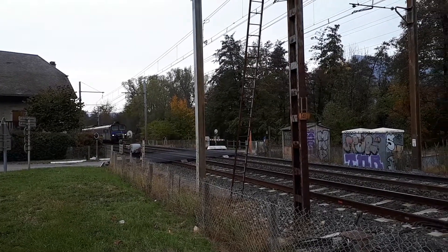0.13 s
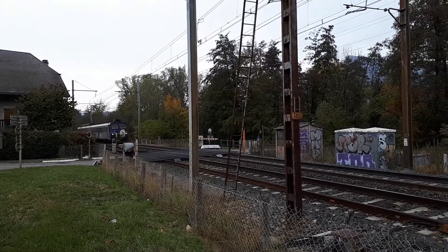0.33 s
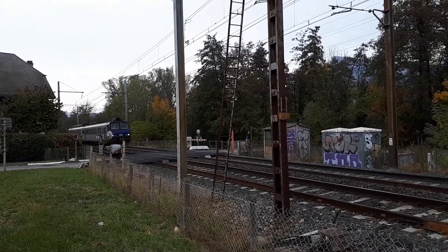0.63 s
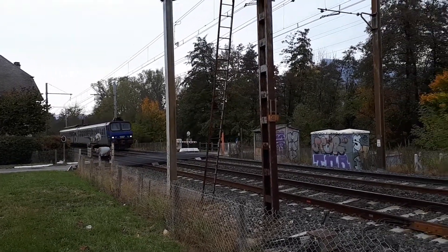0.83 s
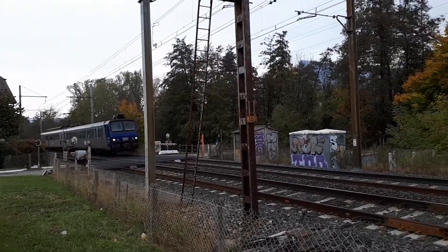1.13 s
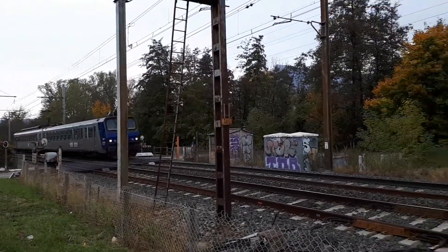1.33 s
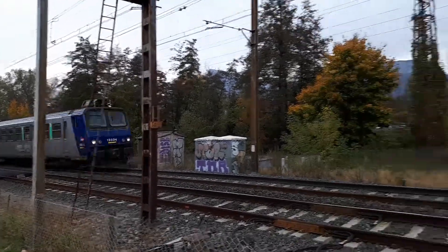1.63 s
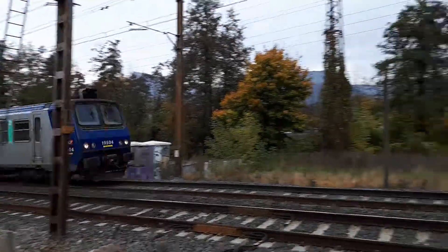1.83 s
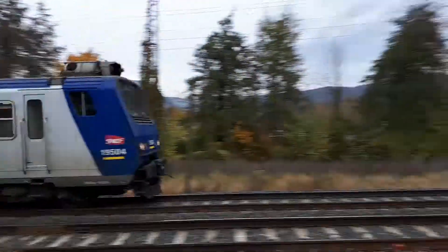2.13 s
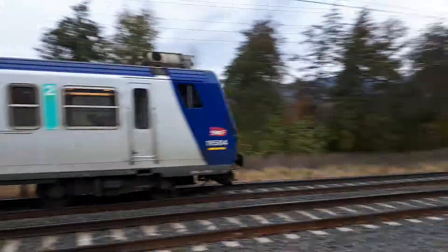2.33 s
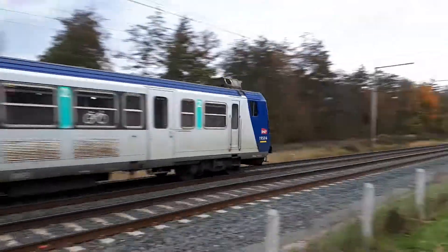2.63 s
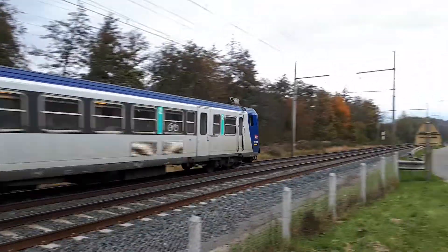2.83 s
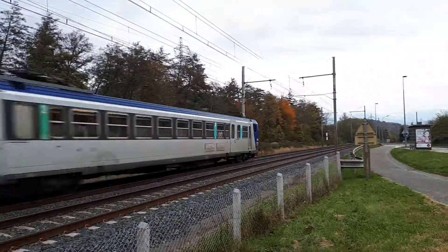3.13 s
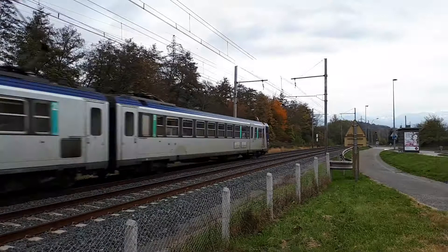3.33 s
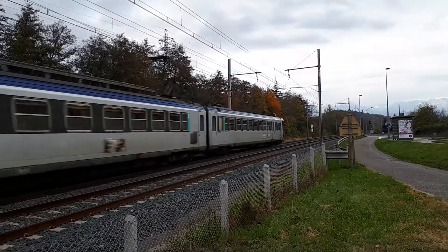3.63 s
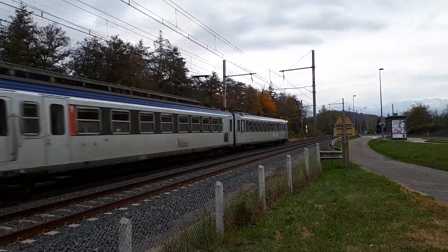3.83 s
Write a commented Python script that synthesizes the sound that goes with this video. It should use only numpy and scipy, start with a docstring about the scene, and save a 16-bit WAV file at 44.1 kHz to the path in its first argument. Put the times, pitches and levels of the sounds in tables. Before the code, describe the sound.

An electric train approaches outdoors, its rolling roar and faint unsteady whine growing from 0 to 1.7 s. One loud, raspy air horn blast lasts from 1.7 to about 2.3 s, its pitch sagging slightly, with faint short echoes. Wheel roar and rumble peak around 2.35 s; bright airy hiss swells near 2.75 s. Rushing cars and falling motor whine continue to 4 s. Close hand-held stereo, level ducking under the horn.

```python
"""An electric train rolls past a lineside position, heard on a hand-held stereo recorder.
Wheels and rails roar as noise ahead, abreast and behind; motors whine in unsteady, sinking lines.
Roof equipment hisses by, and an air horn of rasped partials sounds once just before it is abreast,
with two echoes, over a faint steady hum and hiss. The recorder turns, and its gain control drops
quickly for loud sound and recovers slowly."""
import sys
import numpy as np
from scipy import signal
from scipy.fft import rfft, irfft
from scipy.io import wavfile
from scipy.ndimage import uniform_filter1d, map_coordinates

SR = 44100
rng = np.random.default_rng(int(sys.argv[2]) if len(sys.argv) > 2 else 0)


def linear_from_db(decibels):
    """Turn decibels (scalar or array-like) into linear amplitude factors; 0 gives 1."""
    return 10 ** (np.asarray(decibels, float) / 20)


def waveform_to_disk(signal):
    """Save audio, clipped to [-1, 1], as 16-bit WAV at the path in sys.argv[1]."""
    frames = np.transpose(np.atleast_2d(signal))
    scaled = np.clip(frames, -1, 1) * 32767
    samples = np.round(scaled).astype(np.int16)
    wavfile.write(sys.argv[1], SR, samples)


N = 176400
TIME = np.arange(N) / SR
EARS = np.array([[.5], [-.5]])  # left, right: a difference is shared equally

# The pass, before gain control: (time [s], front roar [dB], side roar [dB], rear roar [dB],
# rumble [dB], left channel lag [samples])
PASS = [(0, -28.5, -50, -60, -35, -5), (.3, -25, -43, -60, -36.5, -4.5), (.7, -24, -35, -57, -32, -4.5),
        (1.1, -20.5, -33, -60, -29.5, -5), (1.35, -16, -47, -57, -27.5, -4),
        (1.65, -14, -22, -46, -25, -5.5), (1.9, -13, -14.5, -44, -23.5, -8),
        (2.2, -18.5, -12, -26, -27.5, -7), (2.35, -14, -6.5, -25.5, -19.5, -9),
        (2.55, -20, -7.5, -17.5, -26, -15.5), (2.75, -37, -13.5, -16, -25.5, -15),
        (3.0, -32, -10, -16, -27, -18.5), (3.15, -33, -15.5, -15.5, -29.5, -18),
        (3.35, -47, -18.5, -13, -25.5, -17), (3.55, -48, -17, -10, -27, -20),
        (3.75, -48, -18.5, -12.5, -27, -18), (3.88, -41, -41, -13, -26, -16.5),
        (4, -47, -28, -13.5, -32.5, -14)]
# Colours of the roar ahead, abreast, behind and of the rumble: (frequency [Hz], relative level [dB per Hz])
FRONT_COLOUR = [(250, -20), (318, -20.5), (466, -2.5), (544, -8.5), (669, -6.5), (809, -6.5), (1070, -0.5),
                (1640, -19.5), (1850, -11), (2160, -18), (2710, -19), (3100, -23), (3930, -23), (4870, -30),
                (7080, -34), (7960, -32), (9210, -51), (11500, -43), (15700, -52)]
SIDE_COLOUR = [(150, -46), (250, -9), (385, -14), (482, -14.5), (603, -3.5), (658, -7), (705, -1.5),
               (1590, -7.5), (1850, -5.5), (2710, -15), (4390, -15.5), (5310, -27.5), (15500, -43)]
REAR_COLOUR = [(150, -49), (250, -16), (335, -13), (583, -6.5), (729, -14.5), (809, 0.5), (1180, -15),
               (1850, -12.5), (2570, -21.5), (4390, -27), (5410, -33), (7380, -33), (8920, -44.5),
               (11400, -42.5), (15500, -49)]
RUMBLE_COLOUR = [(15, -58), (25, -32), (66, -6), (150, 0), (205, 1), (281, -5), (313, -12.5), (330, -7),
                 (430, -38), (730, -120)]
# Motor and gear whine: (time [s], pitch [Hz], level [dB], low gear line [dB re level], octave [dB re level])
WHINE = [(0, 1070, -37, -17, -7), (.8, 1060, -32, -0.5, -21), (1.5, 1042, -27.5, -5, -14),
         (2.3, 990, -20, -21, 10.5), (2.75, 948.2, -20.5, -7, 5), (3.05, 887, -22, -27, 8),
         (3.3, 838.5, -21, -18, -14), (3.55, 813.5, -18.5, -28.5, -3.5), (4, 812, -21, -29, -12)]
# Whine lines: (ratio to pitch [1], drift corner [Hz], unlikeness at the ears [1])
WHINE_LINES = [(1.0, 11, .5), (.449, 7, .3), (2.0, 70, .5), (1.08, 25, .7)]
# Roof equipment going by: (time [s], level [dB])
HISS = [(2.2, -21), (2.45, -14.5), (2.6, -9.5), (2.75, -8), (2.9, -11.5), (3.05, -17), (3.3, -25),
        (3.6, -30.5), (4, -58)]
# Its colour: (frequency [Hz], relative level [dB per Hz])
HISS_COLOUR = [(880, -12), (1500, -10.5), (1860, -3.5), (2700, -16), (3630, -19), (4330, -12.5),
               (5380, -16), (7740, -10), (8970, -21), (12200, -14), (15700, -19)]
# Horn at the two ears; ground and lineside echoes make its partials swell and fade as it sweeps by:
# (time [s], then left, right relative level [dB] of 1st, 2nd, 3rd and upper partials)
HORN = [(1.7, -16, -14, -27, -24, -43, -42, -31, -39), (1.715, -11, -22, -10, -11.5, -21, -25, -22, -24),
        (1.75, -9, -19, -8.5, -9, -13.5, -21, -19, -23), (1.79, -13.5, -19, -16, -27, -23, -27, -20, -21),
        (1.825, -17.5, -18.5, -12, -11.5, -13.5, -21, -16, -16.5),
        (1.86, -19, -8.5, -19, -27, -46, -26, -22, -23),
        (1.9, -15, -8, -10.5, -12.5, -16.5, -22, -23.5, -23),
        (1.94, -13.5, -10.5, -16, -15, -18, -19, -17.5, -18),
        (1.99, -15.5, -9.5, -12.5, -14.5, -18, -36, -18.5, -16.5),
        (2.04, -17, -8.5, -18, -19, -25, -34, -19, -16.5), (2.085, -26, -13, -15, -10, -17, -22, -19, -18),
        (2.125, -18, -35, -21, -27, -16, -15, -13.5, -19),
        (2.165, -35, -19, -14.5, -15, -12.5, -21, -17, -21),
        (2.21, -29, -40, -15, -17, -13, -27, -22.5, -24.5),
        (2.25, -37, -20, -23.5, -15, -14, -37, -26, -22.5),
        (2.285, -15, -18, -21, -18.5, -28, -14, -27, -30)]
# Horn spectrum: (multiple of pitch [1], relative level [dB])
HORN_PARTIALS = [(1, -4.5), (2, 3.5), (3, 6), (4, -12), (5, -14), (6, -15.5), (7, -14.5), (8, -18.5),
                 (9, -19), (10, -23), (11, -21.5), (12, -25), (13, -29), (14, -23), (15, -22.5), (16, -29),
                 (17, -21), (18, -27), (19, -27), (20, -34), (21, -26), (22, -23), (23, -34)]
# Horn pitch: (time [s], pitch [Hz])
HORN_PITCH = [(1.7, 742), (1.716, 715), (1.735, 706), (1.75, 702.5), (1.8, 699), (1.94, 694), (2.04, 685),
              (2.3, 664)]
# The bell's beam turns, dulling the top: (time [s], tilt [dB per partial])
HORN_TILT = [(1.7, 0), (1.72, 0), (1.86, 0.07), (1.9, -0.4), (1.93, -0.0543), (2.1, -0.15), (2.2, -0.6),
             (2.28, -1.4)]
# Horn echoes from things ahead and behind:
# (delay [s], pitch [Hz], relative level [dB], top partial cut [Hz])
ECHOES = [(0.2, 620, -22, 670), (0.08, 714, -32.5, 4100)]
# Partials of each echo: (relative level [dB])
ECHO_PARTIALS_DB = [-2.5, -9, 2]
# Rise of each echo during the blast: (rate [dB/s])
ECHO_SWELL = [12, 45]
# Steady low and high backgrounds: (frequency [Hz], relative level [dB per Hz])
FAR_HUM_COLOUR = [(25, -30), (50, -4), (70, 2), (100, -2.5), (140, -24)]
FAR_HISS_COLOUR = [(5000, -16), (6800, -8), (7900, 4), (8800, -20), (11500, -9), (15700, -20)]
# Stereo image of all noises: (frequency [Hz], left-right likeness [1])
LIKENESS = [(100, 1), (300, 0.94), (500, 0.95), (900, 0.31), (1500, 0.67), (2300, 0.52), (4000, 0.47),
            (8000, 0.21), (14000, 0.33)]
# Stereo balance, scaled for each noise: (frequency [Hz], left minus right [dB])
LEAN = [(60, -1), (180, 0.0), (550, 1.0), (1650, -1.5), (4970, 4), (15000, 4)]

HORN_DB, HORN_START_S, HORN_END_S = 16, 1.695, 2.27
HORN_ATTACK_S, HORN_RELEASE_S = .016, .02


def in_time(rows):
    """Columns of a table, read at every sample."""
    s, *columns = np.transpose(rows)
    return [np.interp(TIME, s, column) for column in columns]


def at_hz(points, hz):
    """A spectrum table read on a log frequency axis."""
    table_hz, values = np.transpose(points)
    return np.interp(np.log(hz + 1), np.log(table_hz), values)


def rms_one(x):
    """Scale to rms 1."""
    return x / np.sqrt(np.mean(x ** 2) + 1e-20)


def drift(corner_hz, count=1):
    """Slow chance of spread 1: noise through two equal low-pass poles, one row per count."""
    step = 40  # samples between drawn points
    pole = np.exp(-2 * np.pi * corner_hz * step / SR)
    noise = rng.standard_normal((count, N // step + 2002))
    slow = signal.lfilter([1], [1, -2 * pole, pole * pole], noise)[:, 2000:]  # settled part
    slow = rms_one(slow)
    return np.array([np.interp(np.arange(N) / step, np.arange(len(row)), row) for row in slow])


def coloured_noise(colour, patchy_db, rate, lean):
    """Stereo noise of a given colour, in up to four registers that each flicker in level."""
    hz = np.fft.rfftfreq(N, 1 / SR)
    mid, side = rfft(rng.standard_normal((2, N)))
    alike = np.clip(at_hz(LIKENESS, hz), 0, 1)
    pair = np.sqrt(1 + alike) * mid + np.sqrt(1 - alike) * side * 2 * EARS
    pair = pair * linear_from_db(at_hz(colour, hz) + lean * EARS * at_hz(LEAN, hz))
    pair = pair * (hz > colour[0][0]) * (hz < colour[-1][0])
    register = np.digitize(hz, [400, 1300, 4000])
    flicker = drift(rate, count=4)
    out = np.zeros((2, N))
    for k in np.unique(register[abs(pair[0]) > 0]):
        out += irfft(pair * (register == k), N) * linear_from_db(patchy_db * flicker[k])
    return rms_one(out)


def wheel_rail_roar():
    """Wheels on rails: noises ahead, abreast and behind, and a rumble, each on its own level curve."""
    front_db, side_db, rear_db, rumble_db, _ = in_time(PASS)
    front = linear_from_db(front_db) * coloured_noise(FRONT_COLOUR, patchy_db=-0.17, rate=4.1, lean=.1)
    side = linear_from_db(side_db) * coloured_noise(SIDE_COLOUR, patchy_db=1.5, rate=4.4, lean=0.86)
    rear = linear_from_db(rear_db) * coloured_noise(REAR_COLOUR, patchy_db=1.7, rate=11.5, lean=1.0)
    rumble = linear_from_db(rumble_db) * coloured_noise(RUMBLE_COLOUR, patchy_db=2.0, rate=9.5, lean=.9)
    return front + side + rear + rumble


def motor_whine():
    """Motors and gears: lines at ratios of one pitch, each broadened by chance in level and phase."""
    pitch, level_db, low_db, octave_db = in_time(WHINE)
    turn = 2 * np.pi * np.cumsum(pitch) / SR
    out = np.zeros((2, N))
    line_levels = [0, low_db, octave_db, -4.5]  # dB re level, in the order of the lines
    for (ratio, corner_hz, apart), db in zip(WHINE_LINES, line_levels):
        a, b, c, d = drift(corner_hz, count=4)
        in_phase = (a + apart * EARS * c) * np.cos(ratio * turn)
        quadrature = (b + apart * EARS * d) * np.sin(ratio * turn)
        out = out + linear_from_db(db) * (in_phase + quadrature)
    return linear_from_db(level_db) * out


def roof_hiss():
    """Roof equipment: bright noise that swells and falls as it goes by."""
    level_db, = in_time(HISS)
    started = TIME > HISS[0][0]
    return linear_from_db(level_db) * started * coloured_noise(HISS_COLOUR, patchy_db=1.1, rate=22.0, lean=1.66)


def horn_tone(delay, pitch_hz, level_db, cut_hz, fade_db):
    """The reed's partials, upper ones fading on their own and rasped by turbulent air."""
    t = TIME - delay
    attack = np.clip((t - HORN_START_S) / HORN_ATTACK_S, 0, 1)
    shape = attack * np.exp(-np.maximum(t - HORN_END_S, 0) / HORN_RELEASE_S)
    live = shape > 1e-4
    jitter = .001 * drift(82.0)[0]  # fraction of the pitch
    turn = 2 * np.pi * np.cumsum(pitch_hz * (1 + jitter)) / SR
    air_filter = signal.butter(2, 330, fs=SR, output="sos")
    air = rms_one(signal.sosfilt(air_filter, rng.standard_normal((2, 2, N))))[..., live]
    out = np.zeros((2, N))
    for k, db in enumerate(level_db):
        fade, sway = drift(22.0, count=4)[:, live].reshape(2, 2, -1)
        dull = 1 / (1 + ((k + 1) * np.mean(pitch_hz) / cut_hz) ** 4)
        loose = min(k / 3, 1) ** 3  # the fundamental stays steady
        rough = .34 * (k / 16) ** 0.64
        phase = (k + 1) * turn[live] + 0.92 * loose * sway + 0.046 * k * k - k * np.pi / 2
        wave = (1 + rough * air[0]) * np.sin(phase) + rough * air[1] * np.cos(phase)
        level = linear_from_db(np.broadcast_to(db, (2, N))[:, live] + fade_db * loose * fade)
        out[:, live] += np.sqrt(2) * dull * level * wave
    return out * shape


def horn():
    """Air horn: the direct blast and two delayed, duller echoes that swell until it ends."""
    first, second, third, upper = np.reshape(in_time(HORN), (4, 2, N))
    (pitch,), (tilt,) = in_time(HORN_PITCH), in_time(HORN_TILT)
    rest = np.array(HORN_PARTIALS)[3:, 1]  # fourth partial upward
    rest = rest - 10 * np.log10(np.sum(linear_from_db(2 * rest)))  # their powers sum to 1
    levels = [first, second, third] + [upper + db + k * tilt for k, db in enumerate(rest)]
    out = horn_tone(0, pitch, levels, cut_hz=30000, fade_db=3.8)
    to_end = np.clip(TIME, HORN_START_S, HORN_END_S) - HORN_END_S
    for (delay, hz, db, cut_hz), swell_db in zip(ECHOES, ECHO_SWELL):
        swell = linear_from_db(swell_db * to_end + 3.5 * drift(22, count=2))  # rise and flutter
        echo_levels = db + np.array(ECHO_PARTIALS_DB)
        out = out + horn_tone(delay, np.full(N, hz), echo_levels, cut_hz, fade_db=3.0) * swell
    return linear_from_db(HORN_DB) * out


def background():
    """Steady low hum and high hiss: two faint bands of noise."""
    hum = linear_from_db(-44) * coloured_noise(FAR_HUM_COLOUR, patchy_db=3.5, rate=7.3, lean=.9)
    hiss = linear_from_db(-54) * coloured_noise(FAR_HISS_COLOUR, patchy_db=0.0, rate=9.5, lean=.1)
    return hum + hiss


def scene():
    """All sources at the lineside; the left channel hears early as the recorder turns."""
    left, right = wheel_rail_roar() + motor_whine() + roof_hiss() + horn() + background()
    lag = in_time(PASS)[-1]  # samples; negative is early
    left = map_coordinates(left, [np.arange(N) - lag], order=3, mode="mirror")
    return np.array([left, right])


def roll_off(x):
    """The treble ends steeply here."""
    return signal.sosfilt(signal.butter(12, 15880, fs=SR, output="sos"), x)


def record(dry):
    """Hand-held recorder: gain quick down when loud, slow back up; peaks rounded, deepest bass cut."""
    limit_db, release_db_per_s, attack_s, sense_s = -6.5, 6, 0.0015, 0.032
    low_cut_hz, top = 45, .95
    power = uniform_filter1d(np.mean(dry ** 2, axis=0), int(sense_s * SR))
    level = 10 * np.log10(power + 1e-12)
    ramp = release_db_per_s * TIME
    held = np.maximum.accumulate(level + ramp) - ramp  # peaks, let down slowly
    over = np.maximum(held - limit_db, 0)
    r = np.exp(-1 / (attack_s * SR))
    x = dry * linear_from_db(-signal.lfilter([1 - r], [1, -r], over))
    x = top * np.tanh(x / top)
    x = signal.sosfilt(signal.butter(2, low_cut_hz, "high", fs=SR, output="sos"), x)
    return roll_off(x)


dry = scene()
out = record(dry)
waveform_to_disk(out)
```